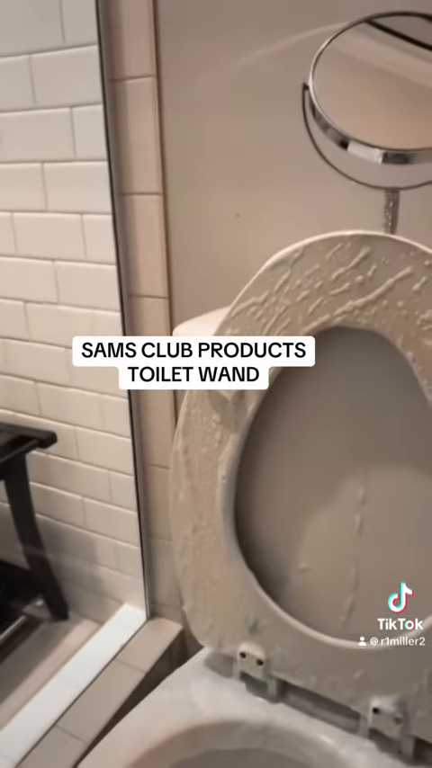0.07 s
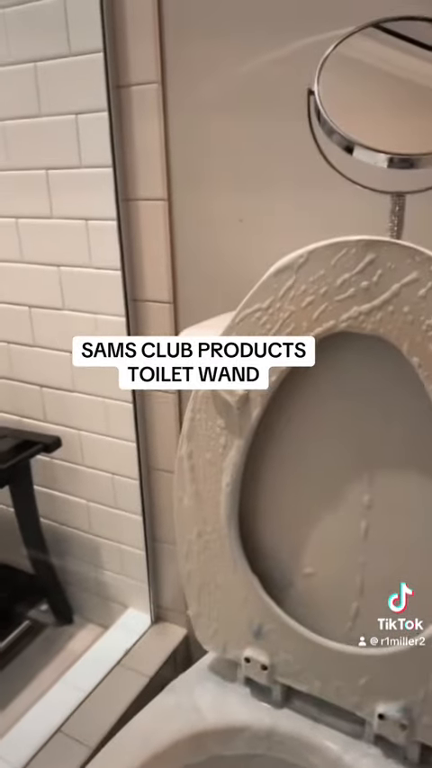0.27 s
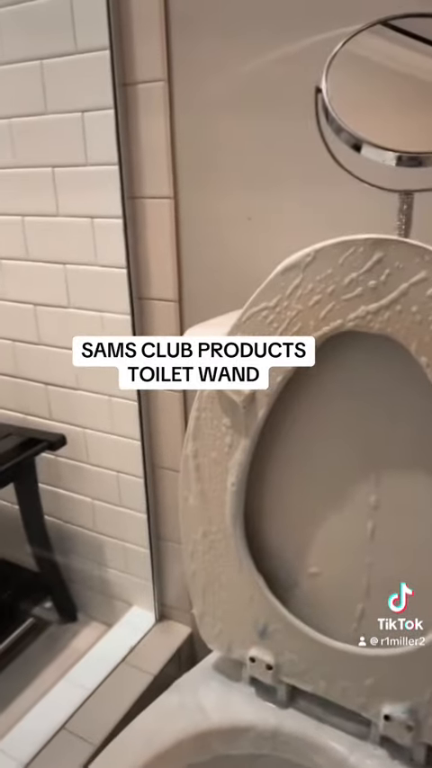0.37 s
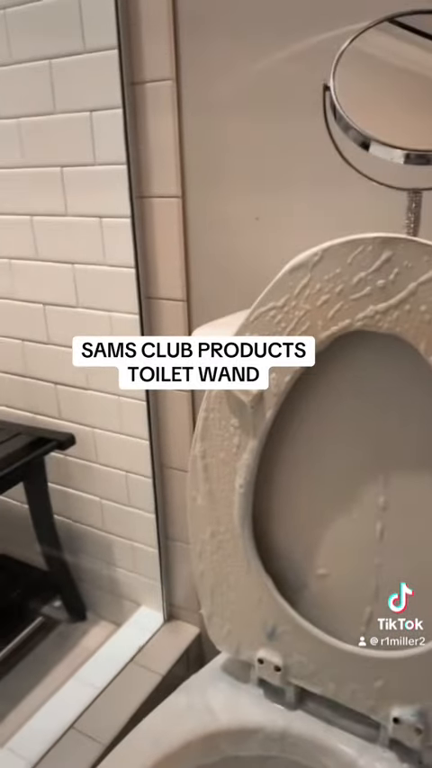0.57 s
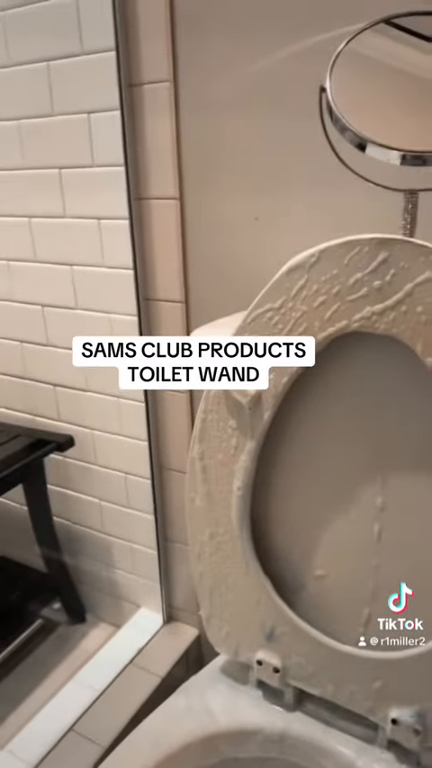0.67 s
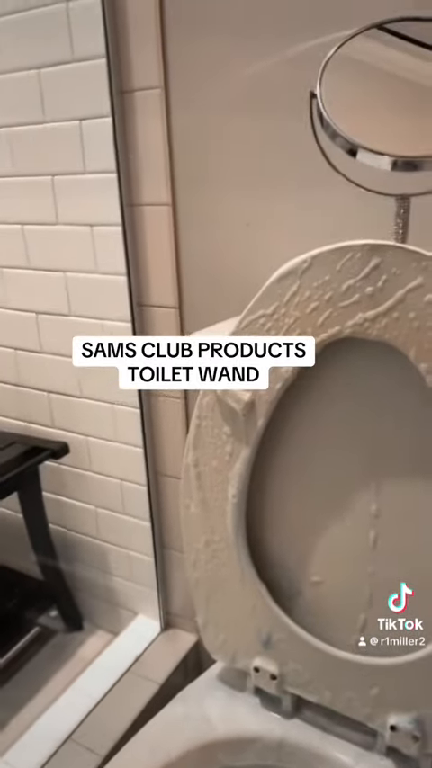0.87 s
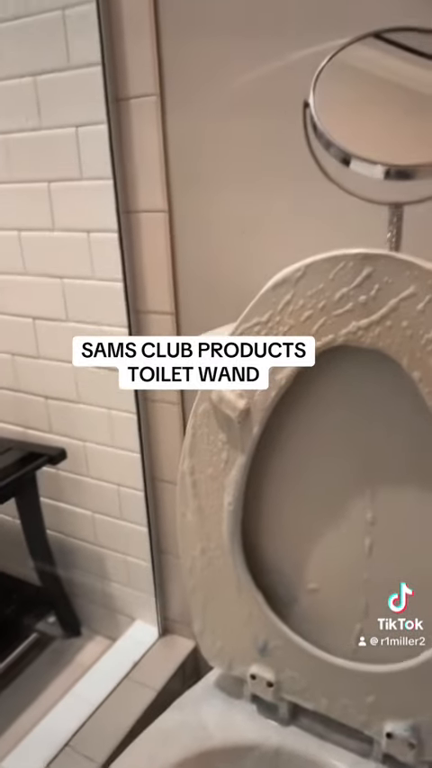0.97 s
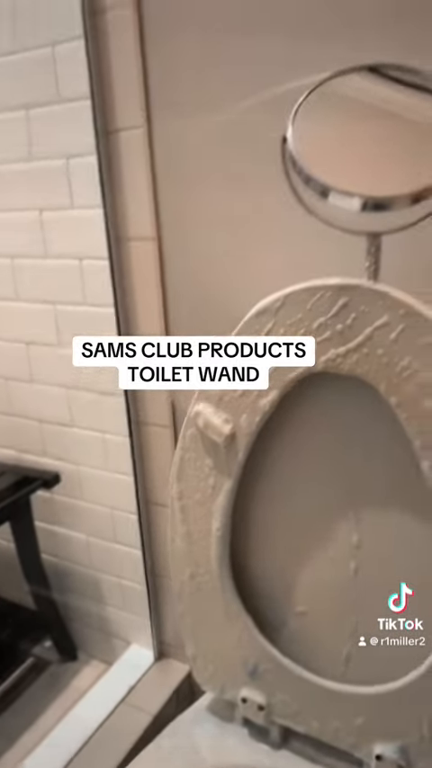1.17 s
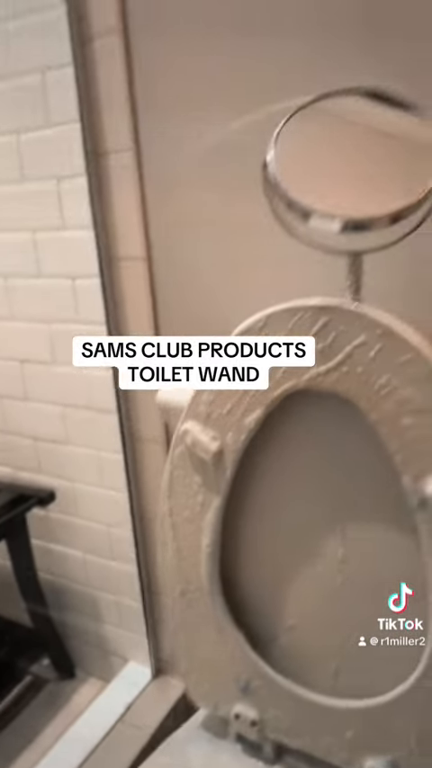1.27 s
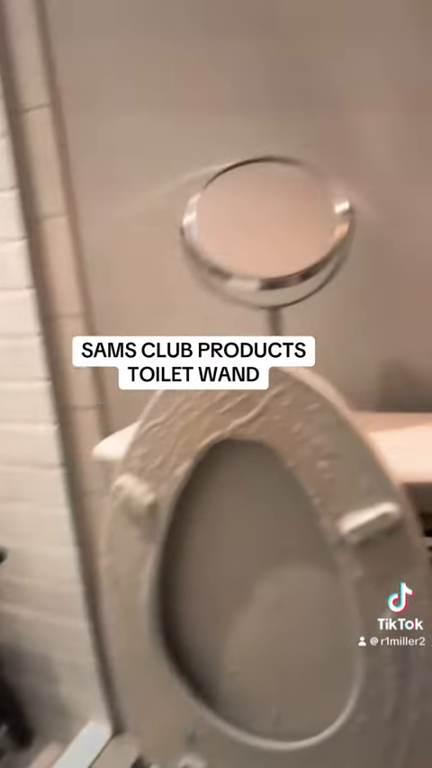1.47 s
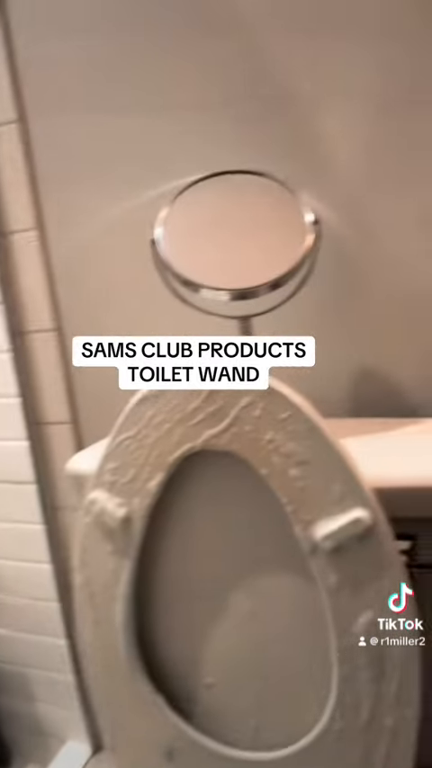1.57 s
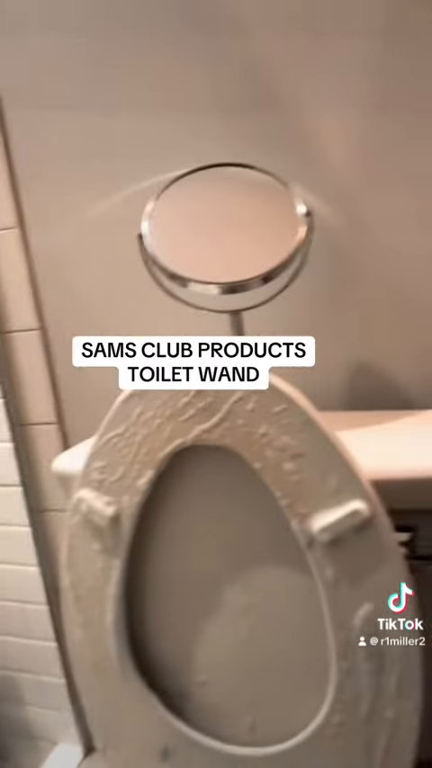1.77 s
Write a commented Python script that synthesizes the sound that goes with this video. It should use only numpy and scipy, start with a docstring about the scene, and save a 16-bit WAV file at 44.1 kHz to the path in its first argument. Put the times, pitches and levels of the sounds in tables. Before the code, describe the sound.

Three sharp knocks of a hard object ring briefly in a small tiled bathroom.

```python
"""A small tiled bathroom, with a wall close by. A hard object is knocked three times, the last hardest.
Each knock reaches the microphone as a dry crack and a short hollow ring; the near wall throws
the crack back, and the tiles hold the sound for half a second. An earlier sound is dying away
at the start. Quiet handling brings soft brushing, low thumps and, late on, two light bumps.
Under it all lies the room tone, a low rumble and a hum."""
import sys
import numpy as np
from scipy import signal
from scipy.fft import rfft, irfft
from scipy.io import wavfile

SR = 44100
rng = np.random.default_rng(int(sys.argv[2]) if len(sys.argv) > 2 else 0)


def inscribe(sig):
    """Save sig as 16-bit PCM at rate SR to the path in sys.argv[1].

    A 1-D sig is mono; a 2-D sig holds one channel per row.
    Samples are clipped to [-1, 1] before scaling.
    """
    pcm = np.round(np.clip(np.atleast_2d(sig).T, -1, 1) * 32767)
    wavfile.write(sys.argv[1], SR, pcm.astype(np.int16))


N = 79380
T = np.arange(N) / SR
HZ = np.fft.rfftfreq(N, 1 / SR)

# How long the tiles hold a sound. Each row: frequency in Hz, seconds to fall 60 dB.
ROOM_T60 = [(100, 0.23), (300, .65), (1050, 0.61), (2500, 0.49), (4500, 0.5), (7000, .41), (10000, 0.34),
            (15000, 0.29)]


def amp(db):
    """Decibels to gain."""
    return 10 ** (np.asarray(db) / 20)


def unit(x):
    """Scales to an rms of one."""
    return x / np.sqrt(np.mean(x ** 2) + 1e-20)


def read(points, hz):
    """Reads a table along a log-frequency axis."""
    f, value = np.transpose(points)
    return np.interp(np.log(hz + 1), np.log(f + 1), value)


def add(mix, start_s, sound):
    """Mixes a sound in at a time."""
    part = mix[round(start_s * SR):][:len(sound)]
    part += sound[:len(part)]


def colour(x, gain_db):
    """Minimum-phase filter with the given gain at each of HZ."""
    log_gain = np.log(amp(gain_db))
    phase = -signal.hilbert(np.r_[log_gain, log_gain[-2:0:-1]]).imag[:len(HZ)]
    impulse = irfft(np.exp(log_gain + 1j * phase))[:4096]
    return signal.fftconvolve(x, impulse)[:N]


def noise(spectrum):
    """Steady noise with the given spectral shape and an rms of one."""
    return unit(irfft(rfft(rng.standard_normal(N)) * amp(read(spectrum, HZ)), N))


def burst(envelope):
    """Noise under an envelope, evened in spectrum, with an energy of one."""
    x = rng.standard_normal(N) * envelope
    x = irfft(np.exp(1j * np.angle(rfft(x))), N) * np.sqrt(envelope)
    return x / np.linalg.norm(x)


def puff(hz, db, peak_s):
    """A low tone that swells to a peak and falls away."""
    return amp(db) * T / peak_s * np.exp(1 - T / peak_s) * np.sin(2 * np.pi * hz * T)


def reflections():
    """Dense reflections off the tiles, each band dying at its own speed."""
    hz, t, bands = signal.stft(rng.standard_normal(N), SR, nperseg=256)
    decay = amp(-60 * t / read(ROOM_T60, hz)[:, None])
    x = signal.istft(bands * decay, SR, nperseg=256)[1][:N]
    return x / np.linalg.norm(x)


def room_tone(hum_hz=331, hum_width_hz=3.4):
    """Low rumble and a hum that wavers slightly in pitch."""
    # The rumble. Each row: frequency in Hz, relative level in dB.
    rumble_spectrum = [(15, -4.5), (28, 0.5), (45, -9.5), (65, 1.5), (110, -11.5), (200, -11.5), (330, -18),
                       (500, -24), (1000, -31.5), (2500, -37), (6000, -40.5), (10000, -47.5),
                       (16000, -50.5)]
    # The hum's rise and fall. Each row: time in seconds, level in dB.
    hum_levels = [(0, -77), (1.0, -85), (1.39, -86.5), (1.46, -71), (1.53, -70.5), (1.6, -79.5),
                  (1.8, -78.5)]
    narrow_band = irfft(rfft(rng.standard_normal(N)) * np.exp(-((HZ - hum_hz) / hum_width_hz) ** 2), N)
    hum = unit(np.cos(np.angle(signal.hilbert(narrow_band))))
    hum *= amp(np.interp(T, *np.transpose(hum_levels)))
    return amp(-67) * noise(rumble_spectrum) + hum


def earlier_sound():
    """Reverberation already dying away at the start."""
    # Its colour. Each row: frequency in Hz, gain in dB.
    fading_spectrum = [(100, -14.5), (300, -3), (550, -9.5), (800, -6), (1100, -1.5), (1550, -4),
                       (1850, -12), (3000, -21), (4300, -16), (5500, -24.5), (7200, -18.5), (9000, -32.5),
                       (15000, -39.5)]
    return amp(-8.5) * colour(reflections(), read(fading_spectrum, HZ))


def bump(level_db, dull_hz, rise_s, thud_db, scuff_t60=0.068, thud_hz=270, thud_t60=0.072):
    """A soft scuffing contact with a low thud and a little room."""
    # The scuff's colour. Each row: frequency in Hz, gain in dB.
    scuff_spectrum = [(60, -7.5), (200, -8), (290, 7), (450, 1), (900, -2.5), (1900, -5.5), (2500, -4.5),
                      (5000, -10.5), (16000, -24)]
    rise, after = np.minimum(T / rise_s, 1), np.maximum(T - rise_s, 0)
    scuff = burst(rise * amp(-60 * after / scuff_t60))
    thud = rise ** 2 * amp(thud_db - 60 * after / thud_t60) * np.sin(2 * np.pi * thud_hz * T)
    room = amp(1.5) * reflections() * rise
    tone_db = read(scuff_spectrum, HZ) - 10 * np.log10(1 + (HZ / dull_hz) ** 2)
    return thud + amp(level_db) * colour(scuff + room, tone_db)


def handling():
    """A faint rustle, light bumps, low thumps, and brushing that swells and fades."""
    # Rustle and brushing. Each row: frequency in Hz, relative level in dB.
    rustle_spectrum = [(100, -8.5), (350, 2.5), (600, -11.5), (1200, -16), (2500, -23), (6000, -30.5),
                       (10000, -32), (16000, -44.5)]
    brush_spectrum = [(500, 1), (3000, 0.5), (8000, -4), (11000, -3), (13500, -3), (16000, -23)]
    # The rustle comes up near the end. Each row: time in seconds, level in dB.
    rustle_levels = [(1.35, -100), (1.5, -75), (1.65, -78.5), (1.8, -72.5)]
    # Each row: start in seconds, scuff gain in dB, treble cutoff in Hz, rise in seconds, thud in dB.
    light_bumps = [(1.529, -24, 1800, 0.021, -55), (1.572, -29.5, 8000, .002, -76)]
    # Each row: start in seconds, pitch in Hz, level in dB.
    low_thumps = [(0.11, 140, -58.5), (0.197, 110, -60)]
    # Each row: start in seconds, length in seconds, level in dB.
    brush_strokes = [(0.013, 0.13, -77.5), (1.424, 0.19, -78.5)]
    out = noise(rustle_spectrum) * amp(np.interp(T, *np.transpose(rustle_levels)))
    for start_s, *settings in light_bumps:
        add(out, start_s, bump(*settings))
    for start_s, hz, db in low_thumps:
        add(out, start_s, puff(hz, db, peak_s=0.0074))
    for start_s, length_s, db in brush_strokes:
        swell = np.sin(np.pi * np.clip((T - start_s) / length_s, 0, 1))
        out += amp(db) * noise(brush_spectrum) * swell
    return out


def standing_waves(build_s=0.0027):
    """The room's strongest resonances swell and die at its own rate, over a short low boom."""
    # Resonances and boom. Each row: frequency in Hz, relative level in dB.
    room_modes = [(173, -51), (206, -52), (270, -50), (298, -52), (429, -50), (474, -53), (607, -48),
                  (654, -49), (749, -51), (797, -53), (903, -48), (1013, -47), (1053, -44), (1077, -45),
                  (1309, -51), (1328, -50), (1350, -49), (1464, -52), (1512, -49), (1590, -52), (2023, -50),
                  (2093, -47), (2368, -53), (2630, -56), (4471, -52), (4592, -55), (6409, -53), (6992, -54)]
    boom_tones = [(115, -56.5), (200, -49), (305, -46)]
    waves = np.zeros(N)
    for hz, db in room_modes:
        waves += amp(db - 60 * T / read(ROOM_T60, hz)) * np.sin(2 * np.pi * (hz * T + rng.random()))
    boom = sum(puff(hz, db, peak_s=0.02) for hz, db in boom_tones)
    return amp(0.5) * (1 - np.exp(-T / build_s)) * waves + boom


def tile_wash(common_tail, common_share=0.6, onset_s=0.009, build_s=0.0013):
    """The room's answer to a knock: reflections partly common to all knocks, partly its own."""
    # The tiled room's colour. Each row: frequency in Hz, gain in dB.
    room_spectrum = [(40, -16.5), (110, -9.5), (190, -5), (290, -4.5), (500, -7), (660, -2.5), (1050, -2.5),
                     (1450, -1), (1750, -5), (2100, -2), (2800, -12), (4400, -8.5), (5400, -13),
                     (7000, -7.5), (8200, -15.5), (11000, -14.5), (16000, -27.5)]
    build = np.clip((T - onset_s) / build_s, 0, 1)
    diffuse = np.sqrt(common_share) * common_tail + np.sqrt(1 - common_share) * reflections()
    return amp(7) * colour(build * diffuse, read(room_spectrum, HZ))


def hollow_ring(swell_cycles=2.6):
    """The object's modes swell over their first cycles and die, neighbours starting in opposite sign."""
    # Each row: frequency in Hz, relative level in dB, seconds to fall 60 dB.
    object_modes = [(658, -24, 0.04), (835, -24, 0.026), (1064, -29.5, 0.074), (1381, -29.5, .04),
                    (1617, -32.5, .04), (2069, -26, .033), (2215, -28, 0.045), (2644, -31.5, .03),
                    (4570, -31, .033), (5370, -34.5, 0.013), (6410, -31.5, .03), (7160, -39.5, 0.017),
                    (9830, -33.5, 0.01)]
    out = np.zeros(N)
    for k, (hz, db, t60) in enumerate(object_modes):
        swell = np.minimum(T * hz / swell_cycles, 1)
        out += (-1) ** k * swell * amp(db - 60 * T / t60) * np.sin(2 * np.pi * hz * T)
    return out


def contact_crack(t60, hold_s=0.0015, spread_db=10):
    """The contact cracks as a cluster of tiny slips of uneven size, quickly dying."""
    # The crack's colour. Each row: frequency in Hz, gain in dB.
    crack_spectrum = [(60, -25), (280, -12), (460, -28), (680, -10), (1300, -11), (1750, -10.5), (2200, -3),
                      (3100, -2.5), (5500, -3), (8000, -7.5), (10500, -4.5), (14000, -15), (17000, -15)]
    slips = rng.choice([-1, 1], N) * amp(spread_db * np.minimum(rng.standard_normal(N), 2.5))
    slips *= amp(-60 * np.maximum(T - hold_s, 0) / t60)
    return amp(3) * colour(slips / np.linalg.norm(slips), read(crack_spectrum, HZ))


def knock(common_tail, waves, level_db, treble_db, send_db, ring_db, bite_db, crack_t60):
    """Crack and ring reach the microphone first, then the near wall's echo, then the room."""
    wall_delay_s, wall_db = 0.0031, -4.5
    treble_hz, bite_hz = 3000, 3850
    crack = contact_crack(crack_t60)
    near = amp(ring_db) * hollow_ring() + crack
    add(near, wall_delay_s, amp(wall_db) * crack)
    room = tile_wash(common_tail) + waves
    shelf_db = treble_db * HZ ** 2 / (HZ ** 2 + treble_hz ** 2)
    bell_db = bite_db * np.exp(-np.log2((HZ + 1) / bite_hz) ** 2)
    return amp(level_db) * colour(near + amp(send_db) * room, shelf_db + bell_db)


def scene():
    """Three knocks over the quiet bathroom, in mono."""
    # Each row: start in seconds; gains in dB for the whole knock, its treble, room send, ring
    # and bite near 4 kHz; seconds for the crack to fall 60 dB.
    three_knocks = [(0.2475, -3.5, 0.5, 2, 3, -1, 0.033), (0.46, -3, 1.5, -0.5, 1, -0.5, 0.026),
                    (0.6408, -2, 4.5, 3.5, 0, 1.5, 0.045)]
    out = room_tone() + earlier_sound() + handling()
    common_tail, waves = reflections(), standing_waves()
    for start_s, *settings in three_knocks:
        add(out, start_s, knock(common_tail, waves, *settings))
    return out[None]


def record(dry):
    """The recorder cuts off everything above 16 kHz."""
    lowpass = signal.firwin(511, 16000, window=("kaiser", 9), fs=SR)
    return signal.oaconvolve(dry, lowpass[None], "same")


dry = scene()
out = record(dry)
inscribe(out)
```